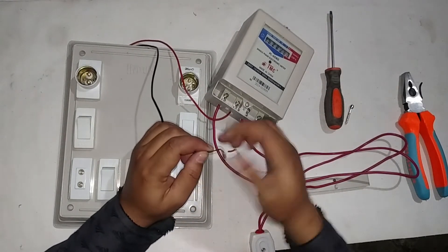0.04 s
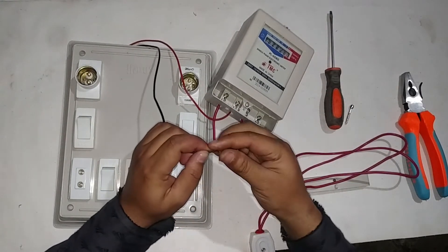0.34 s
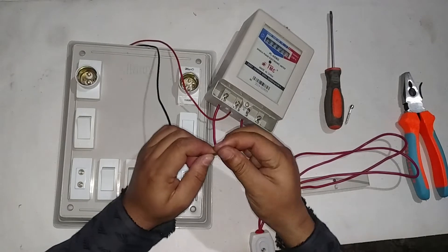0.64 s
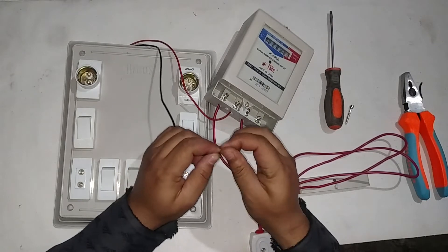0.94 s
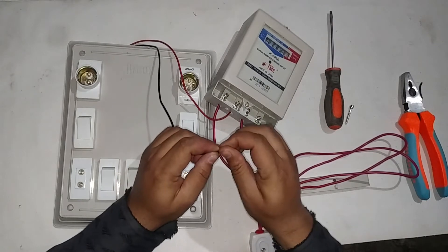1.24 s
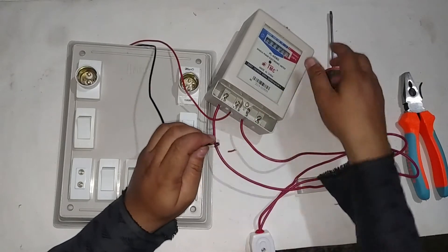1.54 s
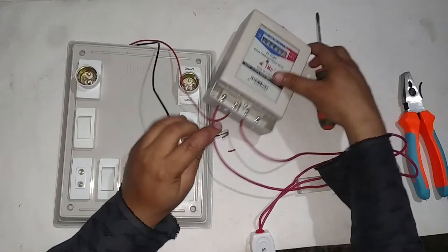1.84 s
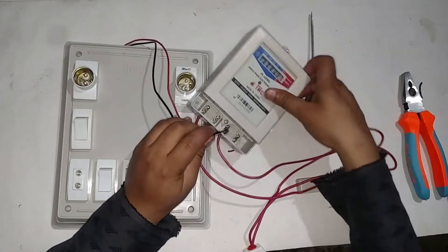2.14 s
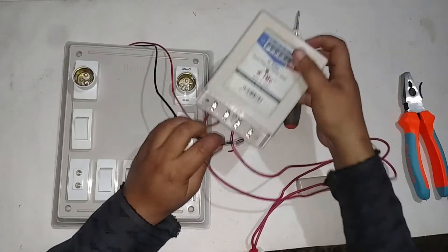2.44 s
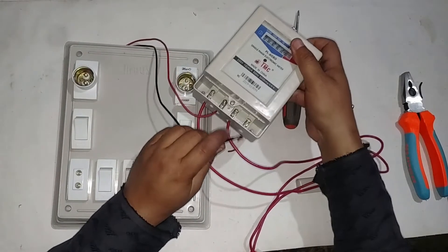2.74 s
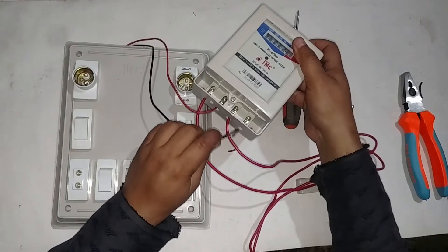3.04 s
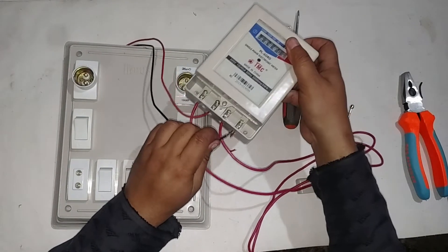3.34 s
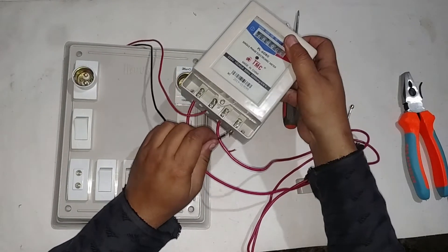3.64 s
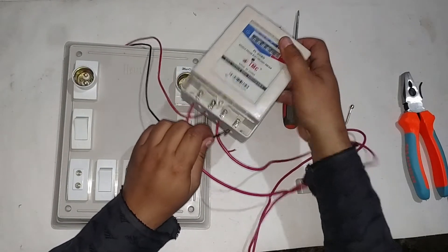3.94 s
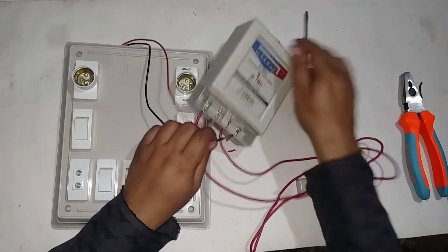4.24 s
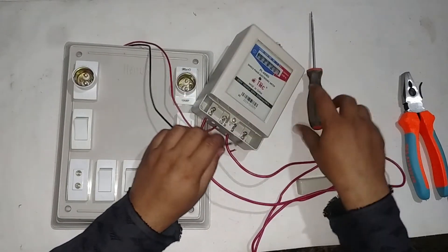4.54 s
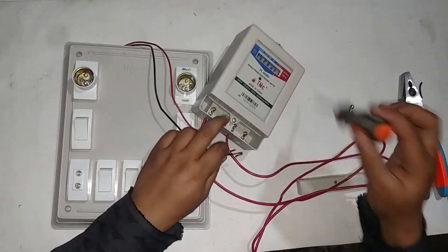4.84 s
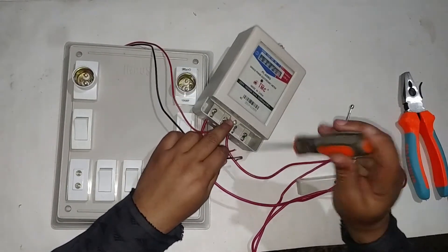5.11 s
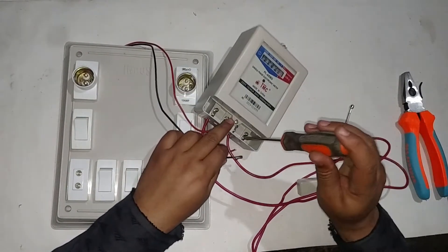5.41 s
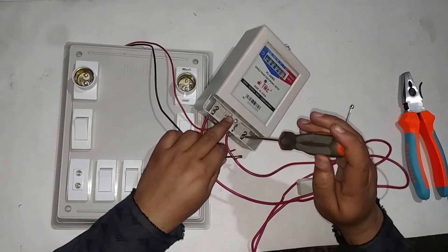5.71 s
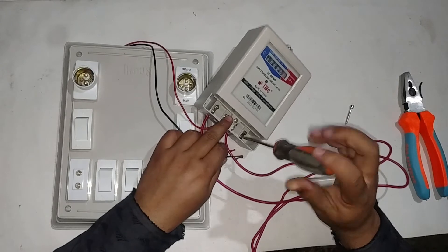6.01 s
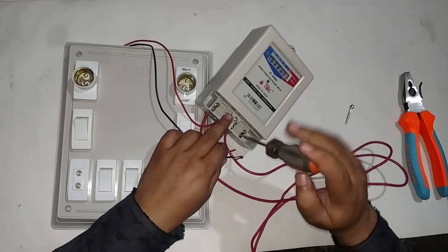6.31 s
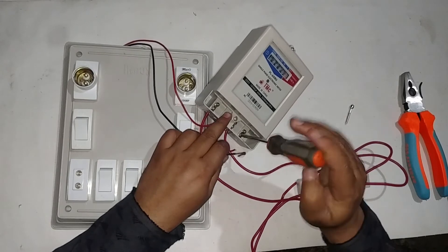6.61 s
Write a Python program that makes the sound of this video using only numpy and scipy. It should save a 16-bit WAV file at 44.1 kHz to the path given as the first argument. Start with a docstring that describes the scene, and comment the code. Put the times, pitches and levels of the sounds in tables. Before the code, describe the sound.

Plastic clatter and a solid clunk as a meter is moved on a tabletop, followed by small screwdriver taps in a quiet room.

```python
"""A plastic electricity meter is dragged over a table, lifted and set down in a small bare room.
Its hollow case judders in quick slips, lands edge after edge and rings the tabletop.
A screwdriver is picked up with a stick-slip squeak, taps the terminals and starts to turn a screw.
Hands and wires rustle over a quiet room hum."""
import sys
import numpy as np
from scipy import signal
from scipy.fft import rfft, irfft
from scipy.io import wavfile

SR = 44100
rng = np.random.default_rng(int(sys.argv[2]) if len(sys.argv) > 2 else 0)


def wav_record(signal):
    """Record a signal, one row per channel, as 16-bit PCM in the file named by sys.argv[1]."""
    frames = np.transpose(np.atleast_2d(signal))
    bounded = np.clip(frames, -1, 1)
    # unit amplitude maps onto the largest positive 16-bit level
    quanta = np.round(bounded * 32767).astype(np.int16)
    wavfile.write(sys.argv[1], SR, quanta)


N = 293849
TIME = np.arange(N) / SR
SAMPLES_PER_MS = SR / 1000


def from_db(db):
    """Decibels to gain."""
    return 10 ** (np.asarray(db) / 20)


def rms_one(x):
    """Scale to rms 1."""
    return x / np.sqrt(np.mean(x ** 2) + 1e-20)


def at_hz(points, hz, column=1):
    """Interpolate a table column over log frequency."""
    columns = np.transpose(points)
    return np.interp(np.log(np.maximum(hz, 1)), np.log(columns[0]), columns[column])


def band(x, hz, kind, order=2):
    """Causal Butterworth filter."""
    return signal.sosfilt(signal.butter(order, hz, kind, fs=SR, output="sos"), x + 1e-18)


def resonate(x, hz, width_hz):
    """One resonance, peak gain 1."""
    return signal.lfilter(*signal.iirpeak(hz, hz / width_hz, fs=SR), x)


def colour(x, spectrum, size=4096):
    """Minimum-phase filter; a unit click yields the energy of 1 ms at full scale."""
    gain = from_db(at_hz(spectrum, np.fft.rfftfreq(size, 1 / SR)))
    cepstrum = irfft(np.log(gain))
    cepstrum[1:size // 2] *= 2
    cepstrum[size // 2 + 1:] = 0
    pulse = irfft(np.exp(rfft(cepstrum)))
    return signal.fftconvolve(x, pulse * np.sqrt(SAMPLES_PER_MS / np.sum(pulse ** 2)))[:N]


def ring(force, modes):
    """Drive decaying modes; neighbours swing in opposite directions."""
    t = TIME[:SR]
    response = sum((-1) ** k * from_db(db - 60 * t / t60_s) * np.sin(2 * np.pi * hz * t)
                   for k, (hz, db, t60_s) in enumerate(modes))
    return signal.fftconvolve(force, response)[:N]


def grains(per_s, spread_db):
    """Random tiny slips of uneven size; rms 1."""
    sizes = from_db(spread_db * np.minimum(rng.exponential(1, N), 3))
    signs = np.sign(rng.random(N) - .5)
    return rms_one(sizes * signs * (rng.random(N) < per_s / SR))


def strokes(rows, attack_s, release_db_per_s):
    """Summed gain of movements: each swells, holds and dies away."""
    return sum(np.clip((TIME - start_s) / attack_s, 0, 1)
               * from_db(db - release_db_per_s * np.maximum(TIME - start_s - length_s, 0))
               for start_s, length_s, db in rows)


def contact(time_s, thud_db, clack_db, crack_db, chatter_s, chatter_db, hardness_hz=4000, size=4096):
    """One cushioned blow plus bright chatter, weighted in three registers."""
    # register edges: (thud top [Hz], clack foot [Hz], clack top [Hz], crack foot [Hz])
    edges_hz = (550, 1150, 2300, 4500)
    chatter = rng.standard_normal(size) * from_db(-60 * TIME[:size] / chatter_s)
    chatter = band(chatter / np.linalg.norm(chatter), 786, "high") * from_db(chatter_db)
    blow = band(signal.unit_impulse(size), hardness_hz, "low") + chatter
    registers = list(zip(edges_hz, (thud_db, clack_db, clack_db, crack_db)))
    gain = from_db(at_hz(registers, np.fft.rfftfreq(size, 1 / SR)))
    blow = colour(blow, registers) * np.sqrt(np.mean(gain ** 2) / SAMPLES_PER_MS)
    start = round(time_s * SR)
    return np.pad(blow, (start, N - start - len(blow)))


def room(x, build_s=0.002, bands=18, size=32768):
    """Diffuse reflections: quick build-up, decay band by band."""
    # reverberation: (frequency [Hz], t60 [s], strength [dB])
    reverb = [(100, 0.78, -2.5), (303, 0.29, 4), (810, 0.45, -1.5), (2000, 0.39, -1.5), (4960, 0.27, 2),
              (12000, 0.15, 4)]
    t, tail = TIME[:size], 0
    edges_hz = np.geomspace(40, 18000, bands + 1)
    white, hz = rfft(rng.standard_normal(size)), np.fft.rfftfreq(size, 1 / SR)
    build = 1 - np.exp(-(t / build_s) ** 2)
    for low, high in zip(edges_hz, edges_hz[1:]):
        centre_hz = np.sqrt(low * high)
        t60_s, strength_db = at_hz(reverb, centre_hz), at_hz(reverb, centre_hz, column=2)
        part = irfft(white * (hz >= low) * (hz < high)) * build * from_db(-60 * t / t60_s)
        tail += from_db(strength_db) * part / np.linalg.norm(part) * np.sqrt(2 * (high - low) / SR)
    return signal.fftconvolve(x, tail)[:N]


def background(hum_db=-58.5, flutter_hz=30, flutter_db=3):
    """Room hum and a faint fluttering whine in the microphone's hiss."""
    # room hum: (frequency [Hz], density [dB])
    hum_spectrum = [(15, -41.5), (25, 0), (75, -5), (140, 0.5), (313, -3), (348, -5.5), (409, -6.5),
                    (468, -8.5), (629, -11), (993, -15), (1840, -19.5), (3610, -25.5), (4980, -30.5),
                    (14200, -37), (15400, -46)]
    # narrow hiss bands: (frequency [Hz], width [Hz], level [dB])
    whine_bands = [(1810, 200, -76.5), (3595, 220, -80), (5580, 500, -84), (10720, 90, -91.5),
                   (14400, 700, -88)]
    hum = from_db(hum_db) * rms_one(colour(rng.standard_normal(N), hum_spectrum))
    whine = sum(from_db(db) * rms_one(resonate(rng.standard_normal(N), hz, width_hz))
                for hz, width_hz, db in whine_bands)
    return hum + whine * from_db(flutter_db * np.sin(2 * np.pi * flutter_hz * TIME))


def handling(rest_db=-76.5):
    """Dull rub of hands and cables; fine crackle of twisted strands."""
    # hand drags the cables: (start [s], length [s], level [dB])
    moves = [(1.68, 0.31, -52.5), (2.05, 0.11, -39.5), (3.96, .22, -50.5), (4.33, 0.12, -40.5),
             (4.54, 0.046, -52), (5.3, 0.044, -58.5), (6.2, 0.14, -58), (6.47, 0.12, -51.5)]
    # fingers twist copper strands: (start [s], length [s], level [dB])
    twists = [(.4, .22, -68), (1.0, .12, -78)]
    # rubbing hands: (frequency [Hz], density [dB])
    rub_spectrum = [(40, 6.5), (120, -7.5), (330, 12.5), (600, 1), (1200, -4), (2200, -20.5), (5000, -36.5),
                    (14000, -56)]
    slips = grains(per_s=1200, spread_db=3)
    motion = from_db(rest_db) + strokes(moves, attack_s=0.036, release_db_per_s=125)
    twist = strokes(twists, attack_s=0.1, release_db_per_s=59)
    rub = motion * rms_one(colour(slips, rub_spectrum))
    crackle = twist * rms_one(band(slips, [900, 6000], "band", order=1))
    return from_db(-2.5) * rub + from_db(-11) * crackle


def screwdriver_squeak(waver_depth=0.017):
    """Stick-slip on the table: wavering inharmonic partials rise and fall over a scuff."""
    # tool slides off the table: (time [s], pitch [Hz], level [dB])
    glide = [(4.675, 960, -70), (4.702, 1158, -49), (4.715, 1436, -46), (4.727, 1590, -46),
             (4.744, 1265, -45), (4.76, 1130, -68)]
    # squeak partials: (pitch multiple [1], level [dB])
    partials = [(.62, -5), (1, -1), (1.38, -11), (1.752, -13.5)]
    times_s, pitch_hz, level_db = np.transpose(glide)
    waver = 1 + waver_depth * rms_one(band(rng.standard_normal(N), 256, "low"))
    phase = 2 * np.pi * np.cumsum(np.interp(TIME, times_s, pitch_hz) * waver) / SR
    tone = sum(from_db(db) * np.sin(multiple * phase) for multiple, db in partials)
    scuff = rms_one(band(rng.standard_normal(N), [700, 2400], "band"))
    envelope = np.interp(TIME, times_s, from_db(level_db), left=0, right=0)
    return envelope * (tone + from_db(-14.5) * scuff)


def screw_rasp():
    """Dense clicks of the turning screw excite narrow metal resonances."""
    # screw gives, then turns: (start [s], length [s], level [dB])
    turns = [(6.429, .011, -49.5), (6.44, 0.022, -51)]
    # screw and shaft resonances: (frequency [Hz], width [Hz], level [dB])
    peaks = [(865, 51, 4), (1290, 30, 5), (2000, 20, 15), (2800, 47, 6), (3500, 74, -5), (4550, 60, 7),
             (4840, 66, -12), (6400, 60, -5), (6800, 65, -8), (8650, 120, -16)]
    # thread rasp: (frequency [Hz], density [dB])
    thread_spectrum = [(200, -1.5), (700, 2.5), (1800, 1.5), (3200, -2.5), (4800, -1.5), (5600, -17),
                       (6700, -2.5), (7500, -17), (8800, -12.5), (11000, -35), (15000, -30)]
    slips = grains(per_s=1500, spread_db=0.5)
    metal = sum(from_db(db) * resonate(slips, hz, width_hz) for hz, width_hz, db in peaks)
    rasp = from_db(-4) * rms_one(colour(slips, thread_spectrum)) + from_db(-8) * rms_one(metal)
    return strokes(turns, attack_s=0.0031, release_db_per_s=196) * band(rasp, 10300, "low")


def screwdriver_taps(chatter_s=0.072):
    """The blade knocks on the terminal block; a glancing touch pings the steel."""
    # blade contacts: (time [s], thud [dB], clack [dB], crack [dB], ping [dB], chatter [dB])
    taps = [(4.821, -26, -20, -19.5, -78, -25), (5.468, -26.5, -28.5, -36.5, -86, 7),
            (5.8, -17.5, -25, -26, -80.5, 5.5), (6.017, -23, -26.5, -28, -69, 2),
            (6.158, -31, -30.5, -21, -55, 0)]
    # contact on the block: (frequency [Hz], density [dB])
    block_spectrum = [(60, -25.5), (250, -2.5), (430, 4), (800, -8.5), (1150, -3.5), (2100, -15),
                      (2900, -22.5), (4300, -27.5), (8000, -37.5), (14000, -76)]
    # damped terminal block: (frequency [Hz], level [dB], t60 [s])
    block_modes = [(323, -18.5, 0.24), (405, -14, 0.14), (527, -8.5, 0.021), (576, -8.5, 0.064),
                   (1026, -13, 0.025), (1334, -7.5, 0.026), (1403, -10.5, 0.025), (1720, -8, 0.014),
                   (2050, -15, 0.019), (3290, -45, 0.039)]
    # steel tip: (frequency [Hz], level [dB], t60 [s])
    tip_modes = [(1920, 21.5, 0.018), (2230, 25, 0.014), (4950, 2.5, 0.017), (8450, 7, 0.012),
                 (9260, 0, 0.022), (10000, 2, 0.022), (10730, -13, .012)]
    force, glance = np.zeros(N), np.zeros(N)
    for time_s, thud_db, clack_db, crack_db, ping_db, chatter_db in taps:
        force += contact(time_s, thud_db, clack_db, crack_db, chatter_s, chatter_db)
        glance[round(time_s * SR)] = from_db(ping_db)
    block = from_db(-3) * colour(force, block_spectrum) + ring(force, block_modes)
    return block + ring(glance, tip_modes)


def table_rumble():
    """The table shudders under the meter's shifting weight."""
    # load shifts: (start [s], length [s], level [dB])
    shifts = [(1.93, 0.11, -63.5), (2.14, 0.049, -55), (4.28, 0.03, -51.5)]
    shudder = rms_one(band(rng.standard_normal(N), [30, 75], "band", order=3))
    return strokes(shifts, attack_s=0.03, release_db_per_s=41.5) * shudder


def meter_drag():
    """The case judders over the table in quick slips, with a groan."""
    # meter slides: (start [s], length [s], level [dB])
    slides = [(1.914, 0.018, -42), (1.939, 0.07, -19.5), (4.283, 0.065, -30)]
    # sliding case: (frequency [Hz], density [dB])
    slide_spectrum = [(50, -8), (150, -6), (240, -17), (320, 12.5), (390, -8.5), (490, 3.5), (660, 6.5),
                      (760, 0.5), (1400, -7), (2500, -25), (4000, -32.5), (7000, -40), (10000, -52),
                      (15000, -67)]
    slips = grains(per_s=830, spread_db=4)
    judder = rms_one(band(colour(slips, slide_spectrum), 130, "high"))
    groan = rms_one(resonate(judder, hz=660, width_hz=70))
    envelope = strokes(slides, attack_s=0.0068, release_db_per_s=260)
    return envelope * (from_db(-3) * judder + from_db(-14.5) * groan)


def meter_knocks():
    """The hollow case clacks edge after edge and rings the tabletop; returns (case, table)."""
    # knocks on the table: (time [s], thud [dB], clack [dB], crack [dB], hardness [Hz],
    # chatter t60 [s], second edge delay [s], second edge gain [dB])
    knocks = [(1.785, -38.5, -30, -26, 2000, 0.14, 0.02, -1), (1.938, -10.5, -20, -14, 3000, .06, .017, 3),
              (2.015, -11.5, -14.5, -26, 2000, 0.028, .013, -3.5),
              (2.214, -31, -23.5, -41, 1600, 0.033, 0.0052, -8),
              (2.284, -25.5, -30, -45, 1500, .015, 0.013, -12),
              (2.298, -28.5, -34.5, -26, 4000, 0.048, .019, -6),
              (2.357, -22.5, -27.5, -17.5, 4000, 0.021, .057, -13),
              (4.020, -11, -8, -15, 5000, 0.023, .0061, -1), (4.313, -4, -2, -9.5, 1250, 0.02, .0125, -14)]
    # contact on the case: (frequency [Hz], density [dB])
    case_spectrum = [(40, -26), (90, -15.5), (160, -5.5), (260, 4.5), (450, -0.5), (800, -11), (1200, -9.5),
                     (2000, -14.5), (3000, -26.5), (4500, -33.5), (7500, -40), (10000, -52.5),
                     (15000, -69.5)]
    # damped plastic case: (frequency [Hz], level [dB], t60 [s])
    case_modes = [(465, -7.5, 0.012), (1064, -5.5, 0.031), (1360, -17.5, 0.012), (1805, -19.5, 0.023),
                  (2174, -43, 0.012)]
    # tabletop: (frequency [Hz], level [dB], t60 [s])
    table_modes = [(175.4, -49, 0.73), (240, -30, 0.53), (322.8, -14, 0.28), (404.7, -17, 0.27),
                   (466, -33, 0.27), (526, -30.5, 0.3), (645, -42.5, 0.49), (970, -22.5, 0.094),
                   (1252, -43, 0.053)]
    force = np.zeros(N)
    for time_s, thud_db, clack_db, crack_db, hardness_hz, chatter_s, delay_s, second_db in knocks:
        first = contact(time_s, thud_db, clack_db, crack_db, chatter_s,
                        chatter_db=0.5, hardness_hz=hardness_hz)
        # less thud: the first edge has already taken the weight
        second = contact(time_s + delay_s, thud_db - 5, clack_db, crack_db, chatter_s,
                         chatter_db=3.5, hardness_hz=hardness_hz)
        force += first + from_db(second_db) * second
    case = from_db(-1.5) * colour(force, case_spectrum) + from_db(-5.5) * ring(force, case_modes)
    return case, from_db(2.5) * ring(force, table_modes)


def scene(drift_hz=0.8):
    """Direct sound and room reflections over the background; mono."""
    case, table = meter_knocks()
    taps = screwdriver_taps()
    friction = meter_drag() + screw_rasp() + handling()
    squeak = screwdriver_squeak()
    send = from_db(-3) * (case + squeak) + from_db(-5) * taps + friction
    # the reflection pattern drifts as hands and meter move
    drift = 2 * np.pi * drift_hz * TIME
    reflections = room(send * np.cos(drift)) + room(send * np.sin(drift))
    direct = case + table + taps + friction + squeak + table_rumble()
    return (direct + reflections + background())[None]


def record(dry, low_hz=29, high_hz=15550):
    """Cut the deepest bass and the top."""
    lowpass = signal.ellip(12, .1, 90, high_hz, fs=SR, output="sos")
    return signal.sosfilt(lowpass, band(dry, low_hz, "high"))


dry = scene()
out = record(dry)
wav_record(out)
```